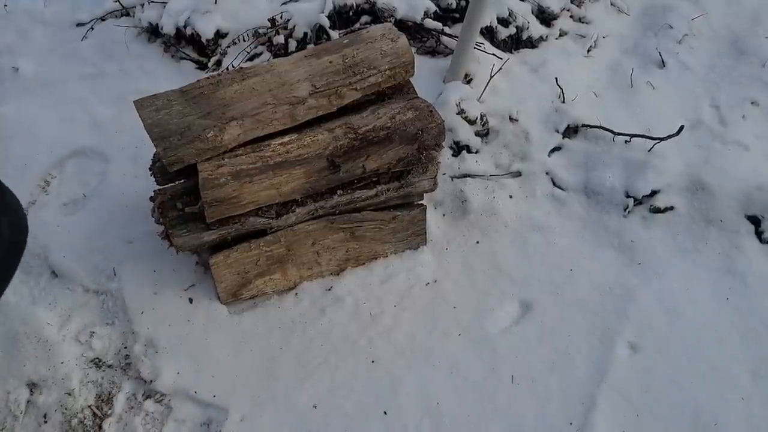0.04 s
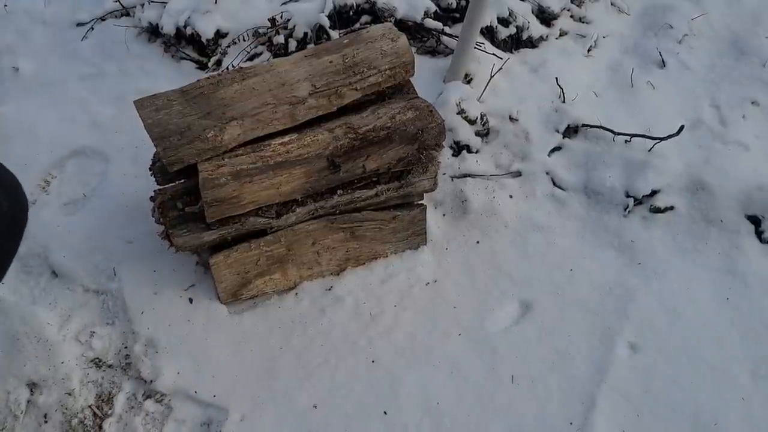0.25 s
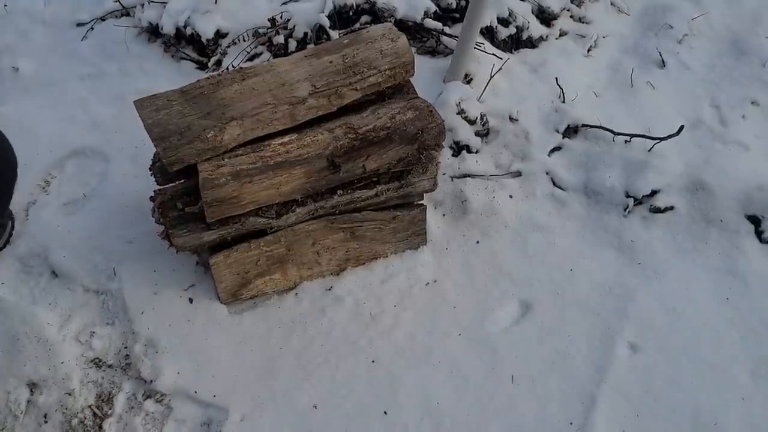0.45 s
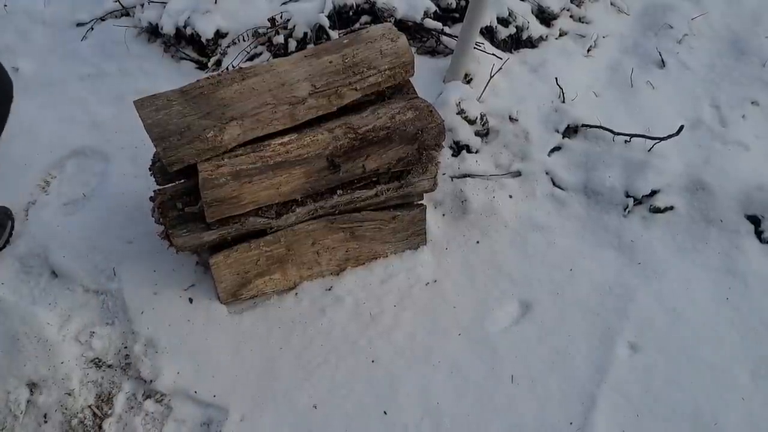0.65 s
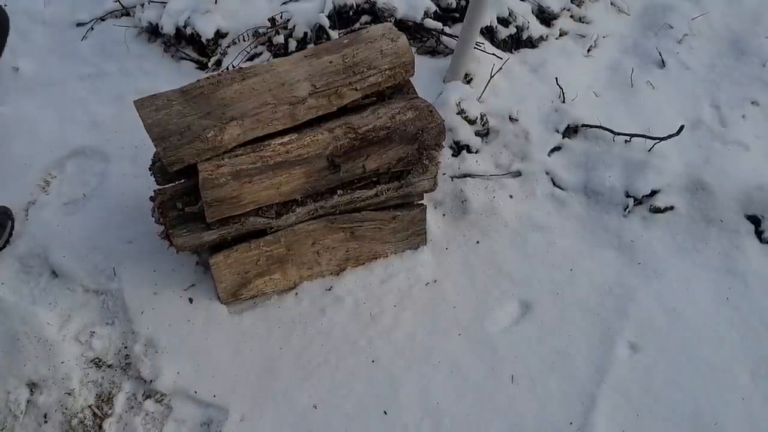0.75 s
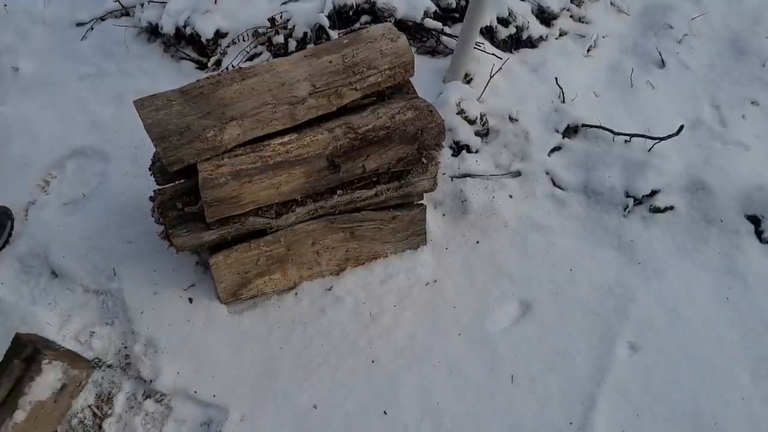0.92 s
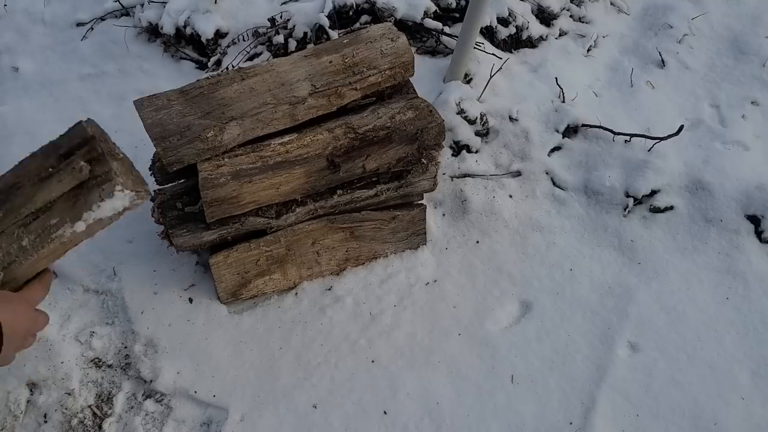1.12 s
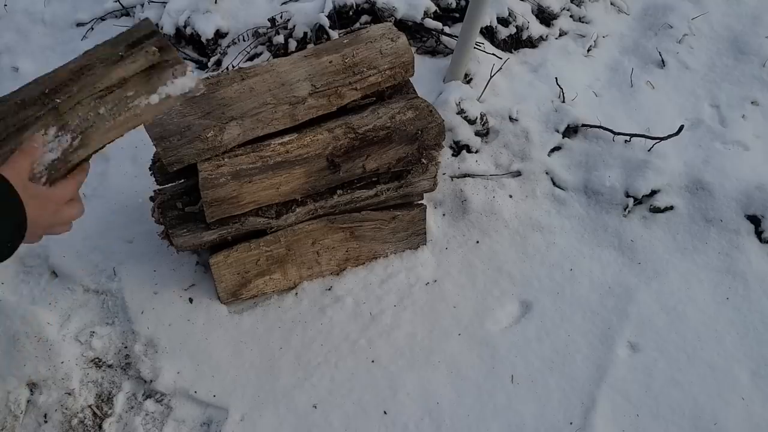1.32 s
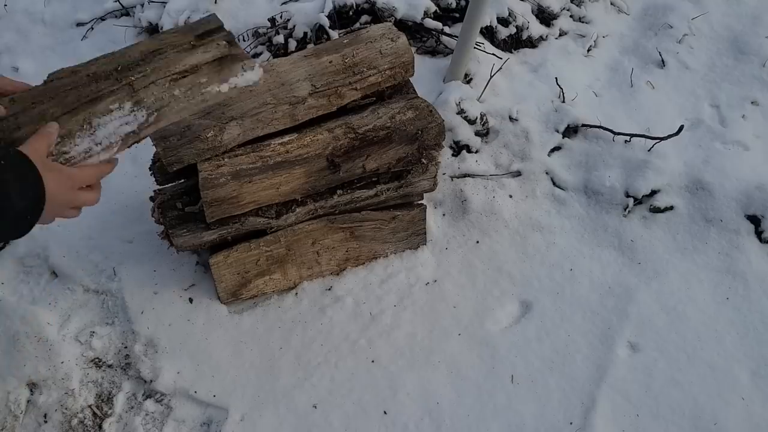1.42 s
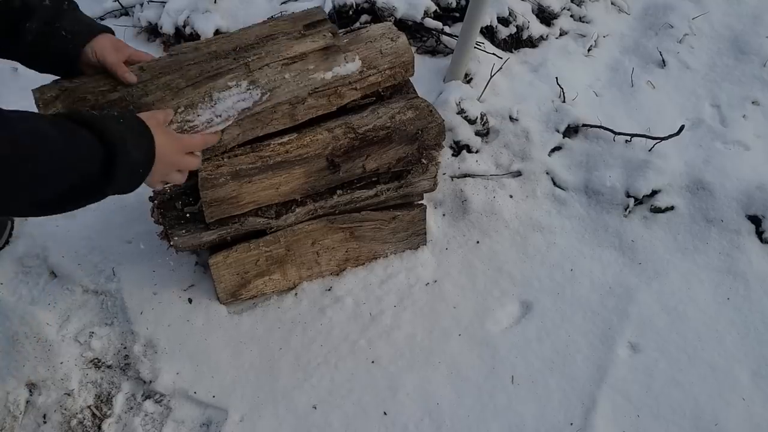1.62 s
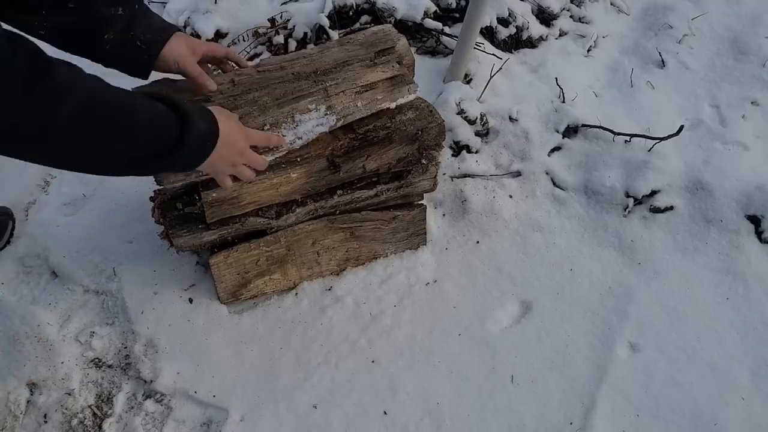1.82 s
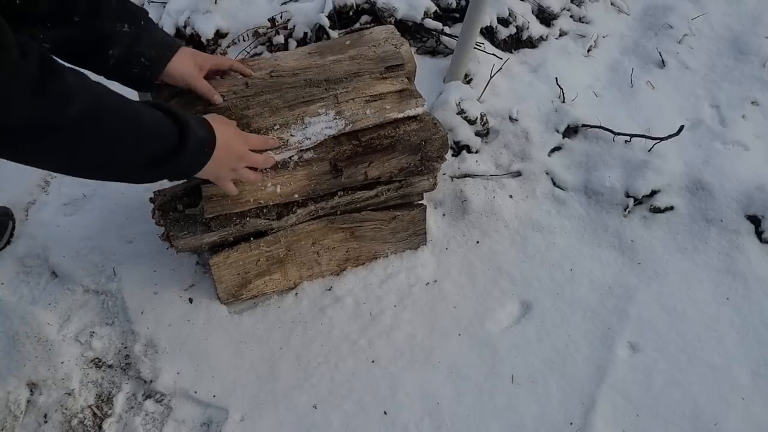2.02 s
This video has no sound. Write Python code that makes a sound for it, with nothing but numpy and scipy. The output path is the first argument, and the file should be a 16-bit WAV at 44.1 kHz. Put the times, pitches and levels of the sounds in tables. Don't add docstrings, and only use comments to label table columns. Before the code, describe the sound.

Low wind flutters on the microphone, then a dry wooden clack as a log lands on stacked firewood.

```python
import sys
import numpy as np
from scipy import signal
from scipy.fft import rfft, irfft
from scipy.io import wavfile
from scipy.ndimage import uniform_filter1d

SR = 44100
rng = np.random.default_rng(int(sys.argv[2]) if len(sys.argv) > 2 else 0)


def boost_factor(decibels):
    exponent = np.asarray(decibels, float) / 20
    return 10 ** exponent


def wav_record(signal):
    frames = np.transpose(np.atleast_2d(signal))
    bounded = np.clip(frames, -1, 1)
    quanta = np.round(bounded * 32767).astype(np.int16)
    wavfile.write(sys.argv[1], SR, quanta)


N = 90757
LEFT_RIGHT = np.array([[1], [-1]])

# start_s, push_ms, stack_thud_db, log_ring_db, bark_crack_db
CONTACTS = [(1.8431, .4, -6.5, -34, -52), (1.8512, .56, -42, -26.5, -50), (1.8601, 1.0, -22, -8, -30),
            (1.8624, .66, -6.7, -19, -27), (1.8645, .6, -36, -40, -40), (1.8668, .47, -14.5, -36, -40),
            (1.8711, .6, -16, -29, -29), (1.874, .3, -16.5, -29, -28), (1.8778, .45, -27, -10.5, -18),
            (1.887, .72, -43, -24, -46), (1.8973, .68, -33, -24, -46), (1.9184, .31, -34, -28, -42),
            (1.9239, .9, -36, -21, -50), (1.948, .4, -40, -36, -45)]
# pitch_hz, level_db, t60_s
STACK_MODES = [(290, -16, .06), (437, 2.6, .0137), (635, -1.3, .011), (790, -13, .03), (1757, -12, .04),
               (2027, -15, .018)]
# pitch_hz, level_db, t60_s
LOG_MODES = [(835, -10, .08), (888, -7.5, .12), (1121, 5.7, .0092), (1219, -6, .018), (1652, 2.4, .008),
             (2450, 7, .011), (3077, 3, .011), (5515, -6, .008)]


def in_time(rows):
    s, *columns = np.transpose(rows)
    return np.array([np.interp(np.arange(N) / SR, s, c) for c in columns])


def at_hz(points, hz):
    point_hz, value = np.array(points)[:, 0], np.array(points)[:, 1]
    return np.interp(np.log(hz), np.log(point_hz), value)


def rms_one(x):
    return x / np.sqrt(np.mean(x ** 2) + 1e-20)


def drift(rate_hz):
    r = np.exp(-80 * np.pi * rate_hz / SR)
    chance = rng.standard_normal(N // 40 + 2002)
    slow = signal.lfilter([1], [1, -2 * r, r * r], chance)[2000:]
    return np.interp(np.arange(N) / 40, np.arange(len(slow)), rms_one(slow))


def ring(force, hz, t60):
    r = boost_factor(-60 / (t60 * SR))
    w = 2 * np.pi * hz / SR
    return signal.lfilter([0, np.sin(w)], [1, -2 * r * np.cos(w), r * r], force + 1e-18)


def coloured(spectrum):
    hz = np.maximum(np.fft.rfftfreq(N, 1 / SR), 1)
    gain = boost_factor(at_hz(spectrum, hz) - 40 * (hz < 15))
    return rms_one(irfft(rfft(rng.standard_normal((2, N))) * gain, N))


def burst(s, hz, length, phase):
    t = np.arange(N) / SR - s
    swell = np.exp(-2 * np.minimum((t / length) ** 2, 50))
    return swell * np.cos(2 * np.pi * hz * t + phase)


def wood_knocks():
    mode_spread_db, mode_side = .5, .11
    grip_s, grip_takes_s, grip_db = 1.9015, .004, -12
    out, t = np.zeros((2, N)), np.arange(N) / SR
    s, ms, thud_db, ring_db, _ = np.transpose(CONTACTS)
    push = np.sin(np.pi * np.clip((t - s[:, None]) / (ms[:, None] * 1e-3), 0, 1))
    push = push / push.sum(axis=1, keepdims=True)
    end = np.arange(len(s))
    for k, (hz, db, t60) in enumerate(STACK_MODES + LOG_MODES):
        strength, side = rng.standard_normal((2, len(s)))
        hit_db = thud_db if k < len(STACK_MODES) else ring_db
        flip = (-1.) ** (1 + k * (end + 1))
        level = boost_factor(db + hit_db + mode_spread_db * strength) * flip
        out += ring((level * (1 + mode_side * side * LEFT_RIGHT)) @ push, hz, t60)
    return out * boost_factor(grip_db * np.clip((t - grip_s) / grip_takes_s, 0, 1))


def bark_cracks():
    rise_s, t60_s = .0008, .011
    t, swell = np.arange(N) / SR, 0
    for s, _, _, _, crack_db in CONTACTS:
        rise = np.clip((t - s) / rise_s, 0, 1)
        swell = swell + rise * boost_factor(crack_db - 60 * np.clip(t - s, 0, 1) / t60_s)
    mid, side = coloured([(300, -20), (1200, 0), (4800, 0), (9000, -14), (16000, -21)])
    return swell * (mid + side * LEFT_RIGHT)


def bark_grinding():
    grits_per_s, grit_in_wood_db = 4000, -32
    # start_s, level_db
    grinding = [
        (1.84, -83),
        (1.846, -41),
        (1.86, -45.5),
        (1.872, -26.5),
        (1.885, -37),
        (1.91, -42),
        (1.96, -56),
        (2.0, -75),
    ]
    t = np.arange(N) / SR
    hits = rng.random((2, N)) < grits_per_s / SR
    size = boost_factor(7.4 * np.minimum(rng.exponential(1, (2, N)), 2))
    grit = hits * size * rng.choice([-1, 1], (2, N))
    band = signal.butter(2, [600, 3600], "band", fs=SR, output="sos")
    grit = rms_one(signal.sosfilt(band, grit + grit[0]))
    grit = boost_factor(in_time(grinding)) * (t > grinding[0][0]) * grit
    out = grit.copy()
    for hz, db, t60 in STACK_MODES + LOG_MODES:
        out += boost_factor(db + grit_in_wood_db) * ring(grit, hz, t60)
    return out


def log_set_down():
    high_pass = signal.butter(2, 175, "high", fs=SR, output="sos")
    return signal.sosfilt(high_pass, wood_knocks() + bark_cracks() + bark_grinding())


def short_ticks():
    split_per_s, split_most = 22.5, .046
    # start_s, level_db, pitch_hz,
    # length_s
    small_ticks = [(.3954, -40.5, 4900, .0014), (0.396, -45, 7400, 0.0003), (0.395, -44, 1200, 0.00084),
                   (.746, -43.5, 3130, 0.0029), (.747, -42, 920, 0.0023), (0.75, -48, 2000, 0.00073),
                   (0.751, -50, 3400, .0015), (0.106, -50, 4000, .0006), (.471, -49, 880, .002),
                   (1.707, -40, 367, 0.0186), (1.952, -43, 1960, 0.002), (1.952, -47, 4000, .001),
                   (2.052, -49, 2500, .0006), (2.053, -31, 250, .003), (1.927, -40, 820, .004),
                   (1.954, -34, 280, .002)]
    out = 0
    for s, db, hz, length in small_ticks:
        a, b = rng.uniform(0, 2 * np.pi, 2)
        split = min(split_per_s * length, split_most)
        upper = burst(s, hz * (1 + split), length, a)
        lower = burst(s + length * .5, hz * (1 - split), length, b)
        out = out + boost_factor(db) * (upper + split / split_most * lower)
    return out


def eddies(rows, tearing):
    swing_trim_db, swing_cycles, tear_s = -1, 1.28, .016
    out = 0
    for s, db, hz, tear_db in rows:
        turn = rng.uniform(0, 2 * np.pi)
        swing = boost_factor(db + swing_trim_db) * burst(s, hz, swing_cycles / hz, turn)
        out = out + swing + boost_factor(tear_db) * burst(s, 0, tear_s, 0) * tearing
    return out


def wind():
    # start_s, left_db, right_db
    gust_rows = [(0, -37, -34.5), (.15, -43.5, -40.5), (.3, -41.5, -58), (.5, -49, -60), (.6, -31, -47),
                 (.76, -41.5, -54), (1.0, -40.5, -41), (1.1, -34, -35), (1.3, -39.5, -37.5),
                 (1.45, -56, -69), (1.7, -56, -47), (2.06, -44, -40.5)]
    # pitch_hz, level_db per Hz
    wind_spectrum = [(20, -5), (40, 2), (75, 1), (150, -9), (300, -37.5), (1000, -100)]
    # pitch_hz, level_db per Hz
    flutter_spectrum = [(60, 0), (190, 6), (300, -4), (520, -17), (900, -41), (2000, -100)]
    # start_s, swing_db, pitch_hz, tearing_db
    left_eddies = [(0.039, -28, 94.5, -37), (0.253, -27, 66, -69), (0.294, -22, 70, -70),
                   (0.357, -27, 77, -56), (0.424, -23, 65.4, -62), (0.498, -46, 63, -53),
                   (0.533, -17.5, 70.6, -35.5), (0.567, -28, 105, -22.5), (0.608, -27, 107, -47),
                   (0.639, -9.5, 116, -23.5), (0.669, -14, 96, -25.5), (0.714, -16.5, 64, -32.5),
                   (0.81, -17.5, 127, -27.5), (0.905, -21, 83, -48), (1.082, -17, 76, -58),
                   (1.144, -32, 99, -59), (1.201, -24, 99, -41), (1.29, -15.5, 89, -22.5),
                   (1.331, -18, 75, -25.5), (1.357, -39, 149, -18.5), (1.387, -16, 50.6, -36),
                   (1.416, -25, 78, -39.5), (1.452, -22, 63.4, -46), (1.627, -21.5, 58, -45),
                   (1.739, -24.5, 73, -43), (1.809, -21.5, 71.5, -37), (1.862, -26, 97, -68),
                   (1.896, -20, 87, -33)]
    # start_s, swing_db, pitch_hz, tearing_db
    right_eddies = [(0.006, -16, 149, -28.5), (0.039, -19.5, 90, -52), (0.41, -28.5, 55, -57),
                    (0.609, -17.5, 74, -47), (0.671, -20, 63, -43), (0.704, -17.5, 71, -35),
                    (0.731, -21, 86, -33.5), (0.822, -33, 57.7, -42), (0.871, -44, 84, -36),
                    (0.899, -24.5, 83, -46), (0.956, -37, 67.5, -47), (1.013, -29, 83, -39.5),
                    (1.076, -16.5, 73, -53), (1.155, -22.5, 78.5, -33), (1.187, -18.5, 51.6, -64),
                    (1.238, -24, 66.6, -43), (1.267, -21, 60, -43), (1.504, -20.5, 66, -51),
                    (1.554, -24, 52, -62), (1.622, -57, 62.7, -47), (1.673, -24.5, 71.4, -62),
                    (1.701, -26, 63.6, -56), (1.744, -19, 71, -57), (1.77, -29, 51, -68),
                    (1.819, -20, 61, -48), (1.866, -17, 71, -68), (1.915, -21, 54, -44),
                    (2.002, -21, 66.4, -53)]
    gust = in_time(gust_rows) + 40
    bed_db = -34 + .34 * gust + 1.63 * np.array([drift(26), drift(35)])
    flutter_db = -47 + 2.2 * gust + 2.2 * np.array([drift(41), drift(15)])
    steady = boost_factor(bed_db) * coloured(wind_spectrum) + boost_factor(flutter_db) * coloured(flutter_spectrum)
    tearing = coloured(flutter_spectrum)
    tearing = tearing / np.sqrt(uniform_filter1d(tearing ** 2, size=500) + .03)
    return steady + np.array([eddies(left_eddies, tearing[0]), eddies(right_eddies, tearing[1])])


def far_yard():
    # pitch_hz, level_db per Hz
    far_spectrum = [(150, -11.5), (390, 0), (900, -14), (1350, -14), (2300, -21), (6200, -24), (7600, -32),
                    (15500, -29.5)]
    # pitch_hz, correlation (-1 to 1)
    likeness = [(60, 0.06), (180, 1), (550, 0.39), (1650, 0.0013), (4970, -0.13), (15000, 0.14)]
    # pitch_hz, left_over_right_db
    balance = [(200, -2), (950, 0), (3800, -3), (15000, -2.5)]
    # start_s, level_db
    far_swell = [(0, 1), (.5, 2), (1.0, -1), (1.5, 0.5), (1.75, 2.5), (2.06, 3.5)]
    mid, side = rfft(coloured(far_spectrum))
    hz, out = np.fft.rfftfreq(N, 1 / SR), 0
    alike = np.clip(at_hz(likeness, hz + 1), -1, 1)
    tilt_db = at_hz(balance, hz + 1) * LEFT_RIGHT / 2
    both = boost_factor(tilt_db) * (np.sqrt(1 + alike) * mid + np.sqrt(1 - alike) * side * LEFT_RIGHT)
    for octave in np.arange(6, 14.6, .5):
        share = np.clip(1 - abs(np.log2(hz + 1) - octave) * 2, 0, 1)
        out = out + boost_factor(1.1 * drift(22)) * irfft(both * share, N)
    return boost_factor(-51.5 + in_time(far_swell)) * out


def scene():
    return log_set_down() + short_ticks() + wind() + far_yard()


def low_pass(x):
    return signal.sosfilt(signal.butter(12, 15700, fs=SR, output="sos"), x)


def record(dry):
    top_cut = signal.cheby2(12, 60, 15800 * 1.024, fs=SR, output="sos")
    return low_pass(signal.sosfilt(top_cut, dry))


dry = scene()
out = record(dry)
wav_record(out)
```